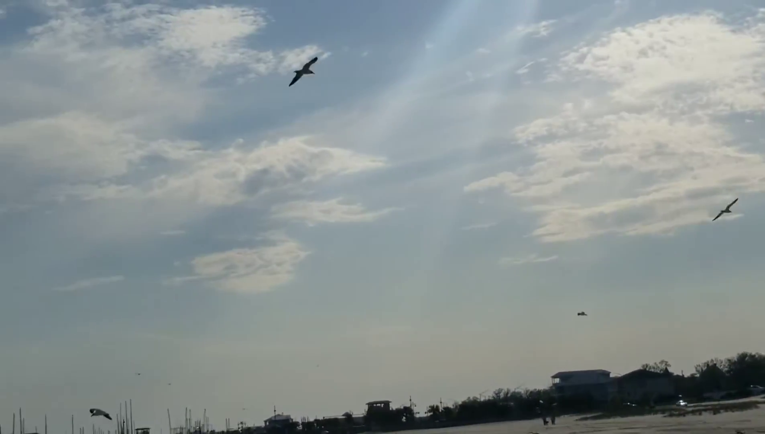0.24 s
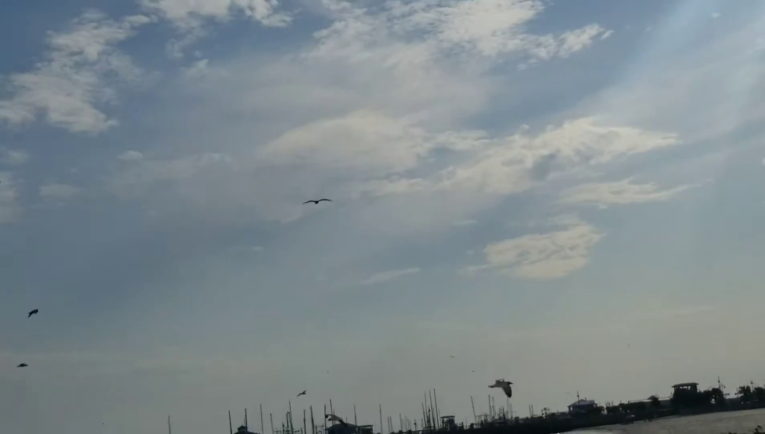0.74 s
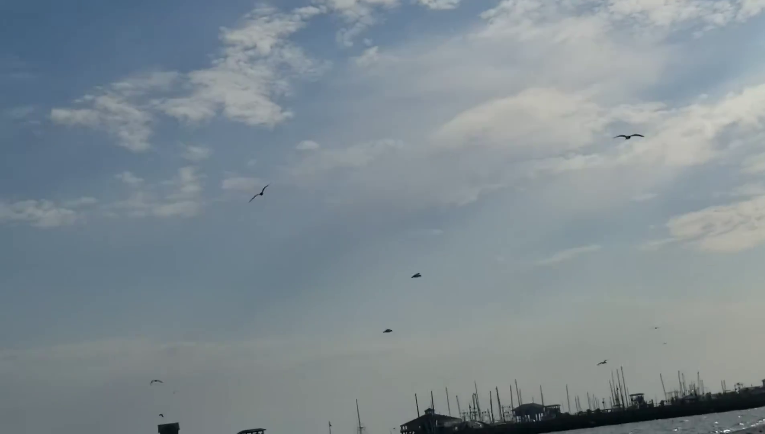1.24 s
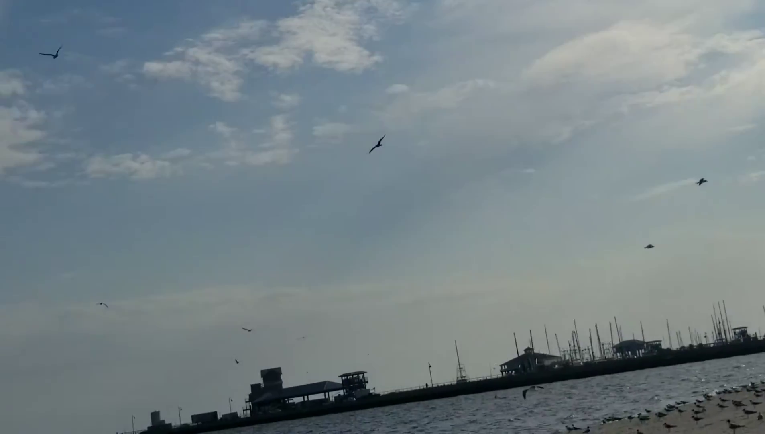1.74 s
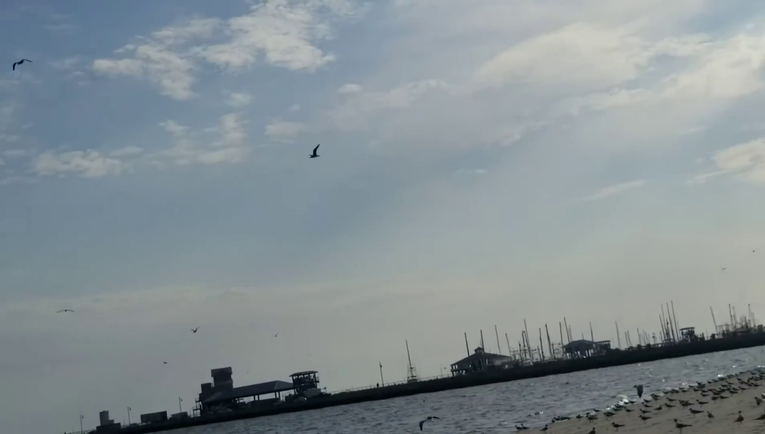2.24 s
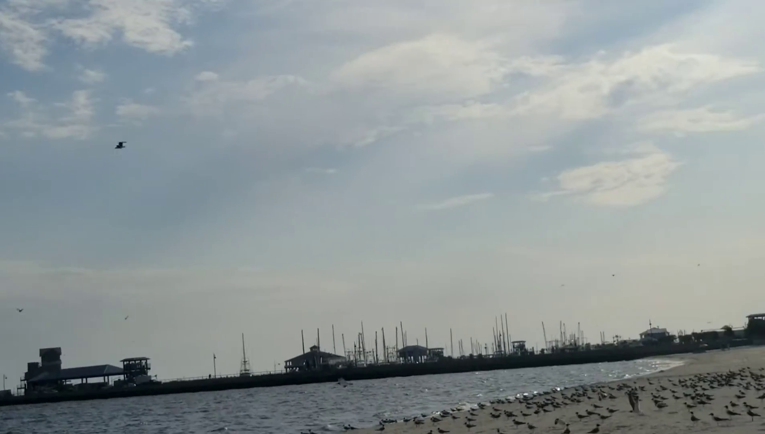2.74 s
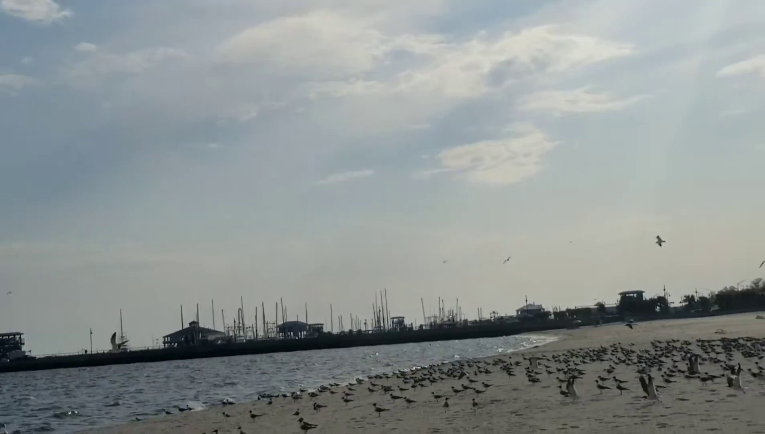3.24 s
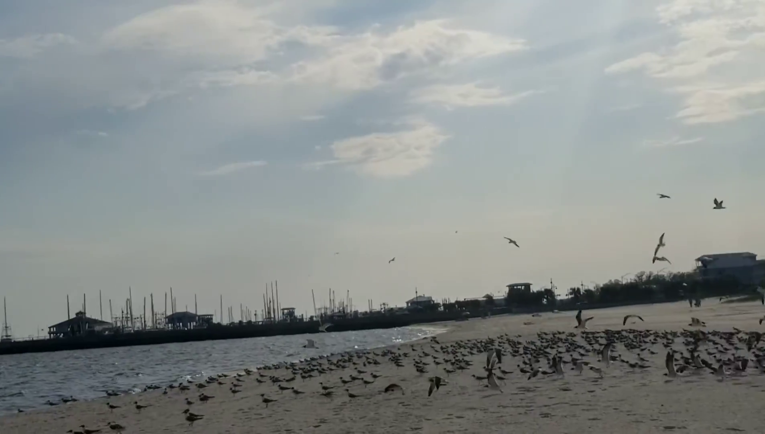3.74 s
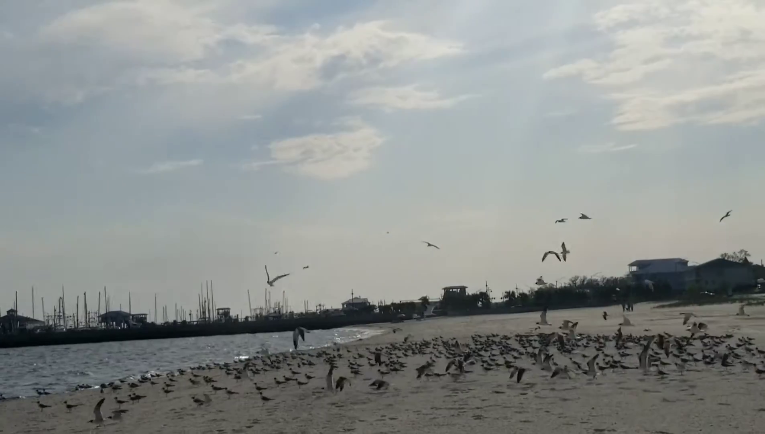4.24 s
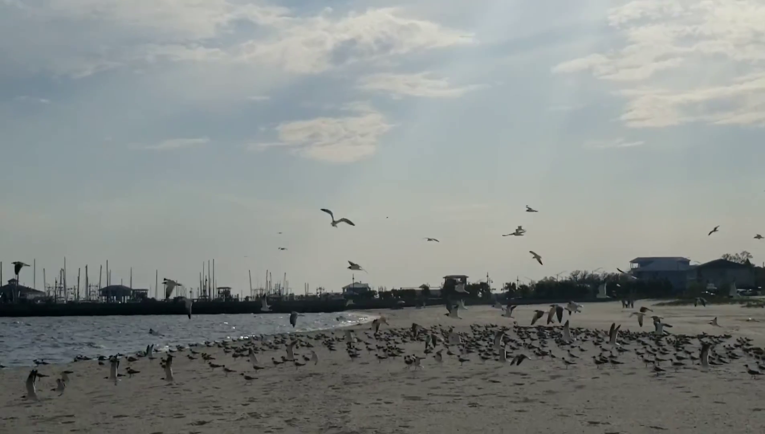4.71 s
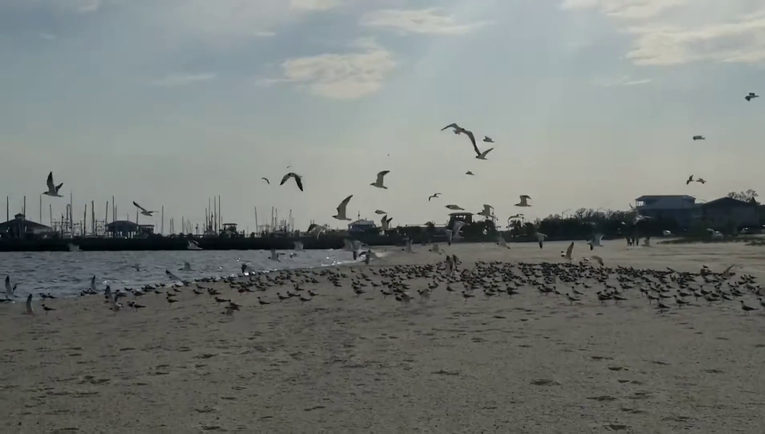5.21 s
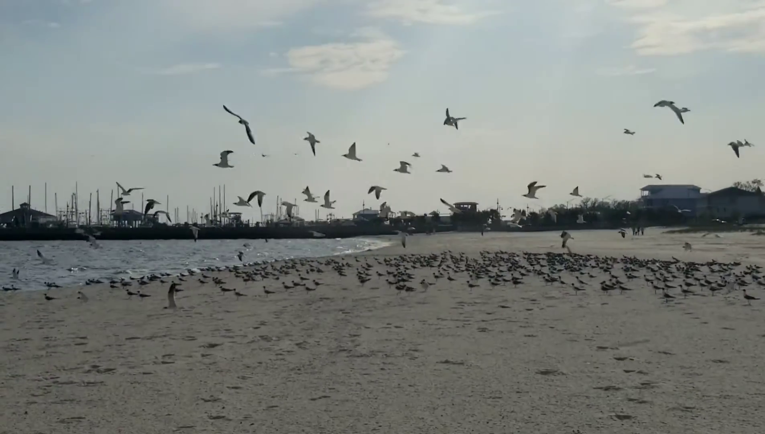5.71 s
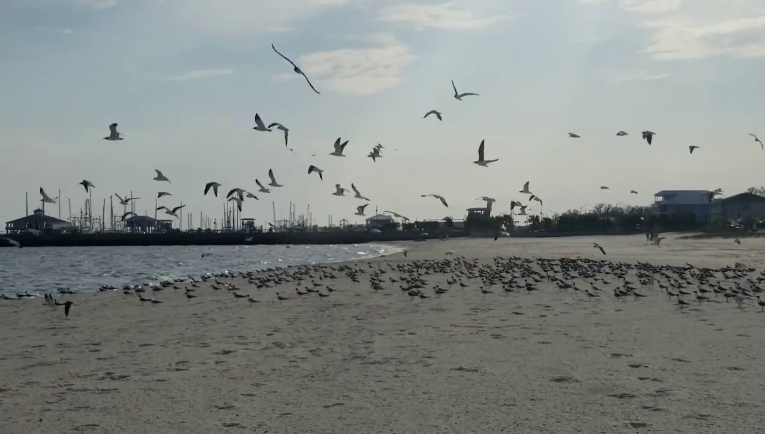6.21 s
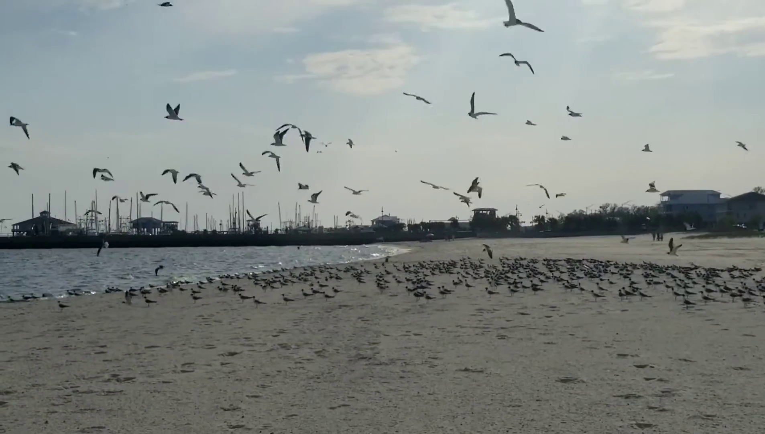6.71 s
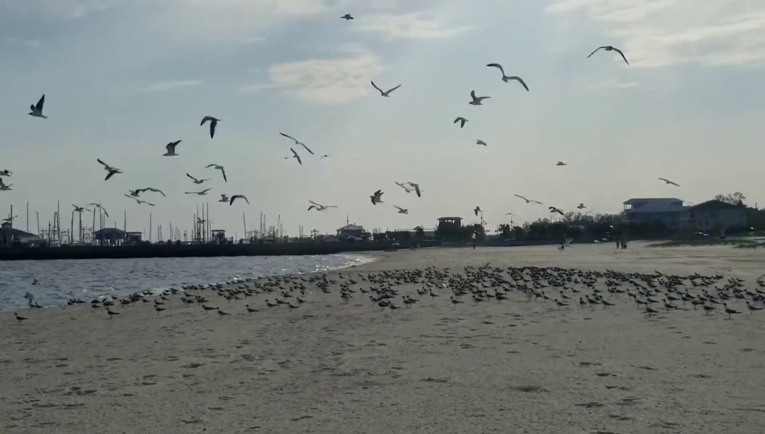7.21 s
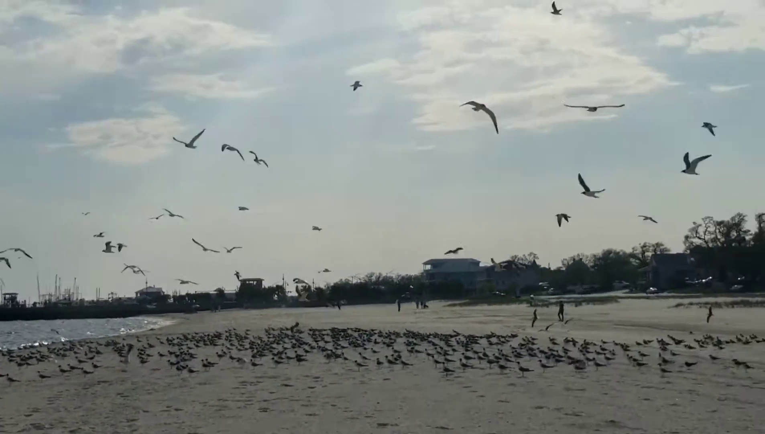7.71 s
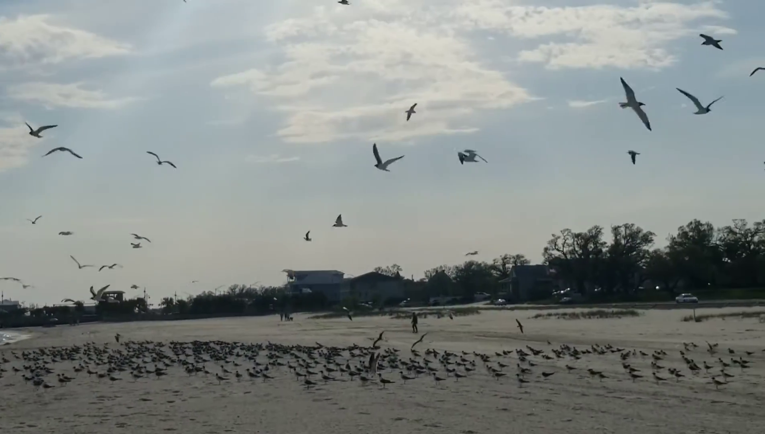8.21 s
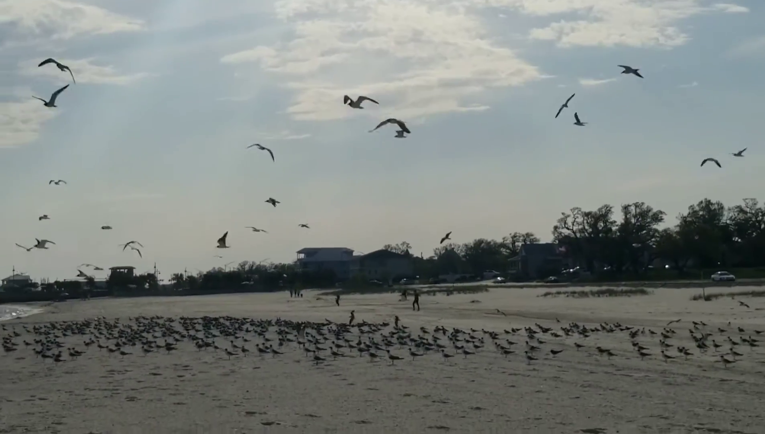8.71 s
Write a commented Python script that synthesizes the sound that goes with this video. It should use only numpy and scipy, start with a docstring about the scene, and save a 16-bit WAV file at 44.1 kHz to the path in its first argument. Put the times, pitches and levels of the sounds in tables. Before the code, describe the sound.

A continuous, overlapping gull racket in stereo: nasal, bright near yelps, mews and a few dipping wails, over a blurred mass of far voices all around. Early on, some soft knocks close to the microphone; later, a few tiny sharp ticks. The closest bird screams raspily about four seconds in, others near seven. Gentle shore wash stays faint, while lumpy wind rumble and buffets increase toward the end. Open air, little echo.

```python
"""Gulls yelp, mew and scream close by, over the constant din of a large flock on an open beach.
Each near cry is a gliding harmonic stack shaped by a throat; the din is hundreds of simpler far voices.
Soft knocks and sharp ticks close by are bursts of resonant noise. Wind on the two microphone ports is
lumpy low noise, with single pressure swings as eddies hit. Small waves hiss as slowly swelling noise."""
import sys
import numpy as np
from scipy import signal
from scipy.fft import rfft, irfft, next_fast_len
from scipy.io import wavfile
from scipy.ndimage import uniform_filter1d, map_coordinates

SR = 44100
rng = np.random.default_rng(int(sys.argv[2]) if len(sys.argv) > 2 else 0)


def master(y):
    """Save y as 16-bit WAV."""
    cut = np.clip(np.atleast_2d(y).T, -1, 1)
    pcm = np.round(cut * 32767)  # scale
    wavfile.write(sys.argv[1], SR, pcm.astype(np.int16))


N = 394694
TIME = np.arange(N) / SR


def amp(db):
    """Decibels to gain."""
    return 10 ** (np.asarray(db) / 20)


def unit(x):
    """Scales to rms 1."""
    return x / np.sqrt(np.mean(x ** 2) + 1e-20)


def read(points, hz):
    """Reads a spectrum table in dB at any frequency, on a log frequency axis."""
    f, db = np.transpose(points)
    return np.interp(np.log(hz + 1), np.log(f + 1), db)


def follow(rows, t):
    """The columns of a curve table at times t."""
    s, *columns = np.transpose(rows)
    return [np.interp(t, s, c) for c in columns]


def colour(x, gain):
    """Filters by a gain that is a function of frequency."""
    size = next_fast_len(x.shape[-1] + 4096)
    spectrum = rfft(x, size) * gain(np.fft.rfftfreq(size, 1 / SR))
    return irfft(spectrum, size)[..., :x.shape[-1]]


def drift(t, hz):
    """A random wobble of about unit size that turns hz times a second."""
    knots = rng.standard_normal(4096)
    return np.interp((t - t[0]) * hz, np.arange(len(knots)), knots)


def panned(db):
    """Left and right gains for a level difference, left minus right."""
    gains = amp(np.array([db, -db]).reshape(2, -1) / 2)
    return gains / np.sqrt(np.mean(gains ** 2, 0))


def add(mix, s, sound):
    """Mixes a stereo sound in at time s."""
    start = round(s * SR)
    sound = sound[:, max(-start, 0):]
    part = mix[:, max(start, 0):][:, :sound.shape[1]]
    part += sound[:, :part.shape[1]]


def scatter(x, t60):
    """Sparse echoes off sand and water, different at each port."""
    t = np.arange(SR // 2) / SR
    sparse = rng.random((2, len(t))) < 1 / 20
    echoes = rng.standard_normal((2, len(t))) * sparse * amp(-60 * t / t60) * (t > .003)
    echoes /= np.linalg.norm(echoes, axis=1, keepdims=True)
    return signal.fftconvolve(x, echoes, axes=1)[:, :N]


EDGE_S = .01  # a call starts this long before its glide

# a gull's throat and open bill [freq_hz, gain_db]
THROAT_SPECTRUM = [(400, -28), (750, -22.5), (1000, -11.5), (1250, -12), (1650, -1.5), (2100, 2.5),
                   (2400, -1), (2900, -2.5), (3500, -4.5), (5000, -5), (6300, -4.5), (7500, -18),
                   (9000, -27.5), (11000, -24), (15000, -36)]


def cry(t, hz, level_db, third_db, bright_db, lead_ms, rasp, flutter_db, slope_db=0, first_db=0):
    """A near gull: gliding harmonics through the throat, with rasp, half-harmonics and screeching air."""
    half_db, throb_share = -20, .75
    top_fall_db = -6  # from the sixth harmonic up
    screech_db, rasp_rise = -7, .02  # turbulent air in a hoarse voice; extra share of rasp per harmonic
    attack_s, release_s = .02, .014
    lead_s = lead_ms / 1000
    jitter = .022 * rasp
    phase = 2 * np.pi * np.cumsum(hz * (1 + jitter * drift(t, 306.4))) / SR
    level_db = level_db + throb_share * flutter_db * drift(t, 45.7)  # the voice catches and throbs

    voice = np.zeros((2, len(t)))
    for k in range(1, 16):
        bill_db = first_db * (k == 1) + third_db * (k == 3) + top_fall_db * (k > 5)
        bill_db = bill_db + (bright_db + slope_db * (k - 4)) * (k > 3)
        gain = amp(read(THROAT_SPECTRUM, k * hz) + bill_db + flutter_db * drift(t, 37.0))
        grit = rasp * (1 + rasp_rise * k) * (drift(t, 520) + 1j * drift(t, 520))
        partial = gain * (1 + grit) * np.exp(1j * (k * phase + 2 * np.pi * rng.random()))
        right = partial * np.exp(2j * np.pi * k * hz * lead_s)
        voice += np.real([partial, right])
    voice *= 1 + amp(half_db) * drift(t, 20.6) * np.cos(phase / 2)  # strong and weak cycles alternate

    puffs = rng.standard_normal(len(t)) * (1 + np.cos(phase))
    air = unit(colour(puffs, lambda f: amp(read(THROAT_SPECTRUM, f))))
    air_ports = np.array([air, np.roll(air, -round(lead_s * SR))])
    voice += amp(screech_db + bright_db / 2) * rasp * air_ports
    edges = np.minimum((t - t[0]) / attack_s, (t[-1] - t) / release_s)
    gate = np.sin(np.pi / 2 * np.clip(edges, 0, 1)) ** 2
    return t[0], np.sqrt(2) * amp(level_db) * gate * voice


def near_call(glide, start, length, pitch_hz, depth, level_db, third_db, bright_db, lead_ms):
    """One call: the glide of its kind, stretched to its length, depth and pitch, then a sagging tail."""
    tail_s, sag_per_s = .019, 3  # the tail loses pitch at this share per second
    t = np.arange(-EDGE_S, length + tail_s, 1 / SR)
    step = np.clip(t / length, 0, 1) * (len(glide) - 1)
    bend = 1 + depth * map_coordinates(np.array(glide, float), [step], order=3, mode="nearest")
    hz = pitch_hz * bend * np.exp(-sag_per_s * np.maximum(t - length, 0))
    rasp = .18 + .15 * np.clip((820 - hz) / 100, 0, 1)  # low notes turn hoarse
    return cry(start + t, hz, level_db, third_db, bright_db, lead_ms, rasp, flutter_db=3.2)


# pitch bend through each kind of call, at even steps from start to end [bend_share, before depth]
YELP_BEND = [-.02, 0, -.03, -.1, -0.22]
MEW_BEND = [-.09, -.045, -.012, 0, -.01, -0.072]
WAIL_BEND = [0.044, 0.015, -.1, -0.14, -0.057, -0.07, 0.019, -0.027, -0.17]
# The calls; pitch_hz is where the bend is 0, depth (a factor) scales the bend, levels are before the
# throat and trim, third_db and bright_db (fourth harmonic up) tilt the voice, lead_ms is the right port's:
# short falling yelps [start_s, length_s, pitch_hz, depth, level_db, third_db, bright_db, lead_ms]
YELP_CALLS = [(0.021, 0.038, 1050, 0.81, -44.5, 5, -3, -0.048), (0.043, 0.052, 1000, 1.1, -45, 1, 3, 0.27),
              (0.088, 0.039, 782, 0.37, -42, -9, -7, 0.26), (0.239, 0.038, 1037, 0.56, -41, -6, -4, 0.5),
              (0.32, 0.032, 970, 0.33, -56, -11, -2, -0.3), (0.36, 0.053, 1038, 0.53, -49.5, 4, 4, 0.25),
              (0.432, 0.04, 1040, 0.7, -43, -7, -9, 0.4), (0.452, 0.03, 870, 0.4, -43, 4, -9, 0.28),
              (0.75, 0.055, 1020, 0.6, -42, -4, -7, 0.1), (0.795, 0.06, 775, 0.35, -40, -8, -10, 0.1),
              (0.578, 0.037, 1104, 0.51, -46, -2, -11, -0.34),
              (0.602, 0.039, 1014, 1.3, -39, -11, -20, 0.18),
              (0.84, 0.046, 940, 0.58, -43.5, -1, -4, -0.29), (1.017, 0.039, 990, 0.95, -39, -7, -7, 0.11),
              (1.177, 0.038, 958, 0.69, -41.5, -13, -4, 0.14),
              (1.289, 0.048, 995, 0.47, -53.5, 3, 3.5, 0.06),
              (1.346, 0.056, 804, 0.35, -36.5, -5, -19, 0.1),
              (1.542, 0.046, 878, 0.71, -35, -2.5, -12, 0.24),
              (1.703, 0.04, 1010, 0.8, -49, -10, -14, -0.51), (1.767, 0.032, 1020, 0.59, -47, -2, 1, 0.28),
              (1.813, 0.088, 923, 0.76, -39, -3, -11, 0.34), (1.93, 0.044, 1036, 0.7, -50, 8, -4, 0.44),
              (2.098, 0.04, 960, 0.77, -49, 7.5, -1, 0.055),
              (2.233, 0.043, 945, 0.47, -34.5, -6.5, -13, -0.36),
              (2.283, 0.055, 1153, 0.88, -41, -5, -7.5, 0.21), (2.661, 0.042, 1052, 0.4, -41, 3, -12, 0.39),
              (3.063, 0.046, 1073, 0.74, -40.5, -8, -5, 0.49),
              (3.255, 0.02, 951.0, 1.03, -35, -9, -7, 0.49), (3.601, 0.047, 1077, 1.2, -45, -1, -4, 0.45),
              (3.685, 0.046, 1066, 1.03, -50.5, 4, -1, -0.33),
              (4.064, 0.034, 1040, 0.5, -43, 4, -2.5, 0.025),
              (4.439, 0.049, 993, 0.57, -42, -6, -2.5, 0.29), (4.527, 0.029, 1045, 0.72, -53, 10, -2, 0.22),
              (4.666, 0.083, 1188, 0.73, -50, -2, -12, 0.14), (4.98, 0.044, 1074, 0.92, -41, 2, -0.5, 0.43),
              (5.13, 0.041, 1184, 0.53, -37, -11, -5, 0.22),
              (5.176, 0.041, 1115, 0.47, -37, -3, -8.5, 0.01),
              (5.278, 0.027, 897, 0.74, -41, -9, -11, 0.046),
              (5.345, 0.055, 955.0, 0.57, -47, -10, 0, -0.41), (5.365, 0.059, 1044, 0.78, -50, 1, -4, -0.3),
              (5.498, 0.034, 1075, 0.71, -41.5, -5, -18, -0.41),
              (5.873, 0.04, 1160, 0.55, -43, -6, -13, -0.47), (5.925, 0.05, 1000, 0.51, -44, 6, -6, 0.44),
              (6.177, 0.048, 985, 0.68, -42, -2, -13, 0.1), (6.229, 0.072, 990, 0.51, -55, 4, -3, 0.16),
              (6.324, 0.058, 1035, 0.5, -48.5, 1, 6, 0.27), (6.343, 0.053, 1016, 0.75, -48, 2, -1, 0.26),
              (6.539, 0.046, 1074, 0.39, -42.5, -6, 0, 0.11),
              (6.558, 0.11, 1000, 0.79, -42, -12, -12, 0.038), (7.028, 0.035, 1125, 0.65, -43, 3, -5, 0.22),
              (7.238, 0.022, 912, 0.32, -52, 14, -4, -0.019), (7.92, 0.05, 930, 0.4, -42.5, -14, -21, 0.12),
              (7.607, 0.045, 1087, 1.03, -44.5, -1, -6, 0.23),
              (7.696, 0.052, 1097, 0.6, -45.5, -1, 0, 0.39), (7.761, 0.047, 1025, 0.49, -40, -6, -9, 0.2),
              (8.03, 0.035, 1020, 0.5, -39.5, -10, -14, -0.077),
              (8.236, 0.04, 1050, 0.55, -40, -5, -8, -0.4), (8.053, 0.051, 905, 0.38, -46.5, 5, -2, -0.049),
              (8.296, 0.046, 1000, 0.56, -43, 4, 2.5, 0.13), (8.327, 0.033, 860, 0.62, -38, -21, -9, 0.057),
              (8.485, 0.04, 915, 1, -40, -20, -8, 0.071), (8.653, 0.045, 890, 0.29, -40.5, -7, -18, 0.1),
              (8.781, 0.051, 905, 0.41, -38, -8, -17, 0.35), (8.561, 0.02, 1068, 0.52, -44, 3, -1, -0.41),
              (8.607, 0.048, 1068, 0.75, -40.5, 0, -4, 0.4)]
# mews, one arch that rises and sinks
# [start_s, length_s, pitch_hz, depth, level_db, third_db, bright_db, lead_ms]
MEW_CALLS = [(0.168, 0.08, 1060, 0.8, -45, -3, 0, -0.13), (0.197, 0.08, 915, 0.9, -38, -8, -8.5, 0.23),
             (0.82, 0.04, 943, 1.2, -43, 0, -14, 0.041), (0.872, 0.045, 820, 0.2, -34.5, -11, -14, 0.1),
             (0.88, 0.07, 975, 0.7, -41, -4, -9, 0.15), (0.97, 0.06, 985, 0.6, -40, -4, -9, -0.36),
             (0.35, 0.06, 1025, 0.7, -47, 4, -1, 0.13), (0.735, 0.1, 905, 0.4, -43, -4, -5, -0.43),
             (0.68, 0.085, 765, 1.8, -41, -12, -14, 0.2), (1.056, 0.077, 960, 0.35, -44, -8, -22, -0.32),
             (1.106, 0.083, 1065, 0.7, -54, 0, -8, 0.082), (1.231, 0.047, 1094, 0.7, -57.5, 18.5, 3, 0.039),
             (1.316, 0.14, 1027, 1.15, -52.5, 10.5, 0, 0.38), (1.377, 0.12, 964, 0.48, -45.5, 0, -5, 0.29),
             (1.548, 0.069, 872, 0.8, -43, -2, -16, 0.33), (1.888, 0.077, 927, 0.7, -50, -1, 4, 0.22),
             (2.044, 0.059, 1024, 0.6, -44.5, 1, -2, -0.062), (2.37, 0.29, 1065, 1.37, -44, -3.5, -7, 0.32),
             (2.514, 0.085, 947, 0.71, -48.5, 5, 2.5, 0.19), (2.783, 0.08, 992, 0.45, -43, 2, 6, 0.34),
             (3.039, 0.2, 974, 0.65, -42, -3, -4, -0.46), (3.146, 0.11, 849, 0.5, -42, -4, -1.5, 0.39),
             (3.432, 0.044, 1015, 1.2, -48, -4, 0, 0.25), (3.499, 0.13, 953, 1, -45, -8, -4, 0.27),
             (3.682, 0.093, 956, 0.75, -50, -2, 3, -0.43), (3.925, 0.09, 1034, 0.75, -46.5, -3, 0, 0.57),
             (4.1, 0.056, 1063, 0.3, -49, -10, -13, 0.45), (4.101, 0.22, 889, 0.53, -38.5, -6, -9, 0.4),
             (4.16, 0.17, 990, 1.7, -42, 3, -2.5, 0.3), (4.412, 0.11, 884, 1.07, -40, -3, -9.5, 0.27),
             (4.552, 0.14, 911, 1.0, -38.5, -9, -9.5, 0.25), (4.795, 0.087, 1044, 1.7, -45, -6, -11, 0.25),
             (5.104, 0.18, 934, 1.0, -42, 0, -2, 0.43), (5.219, 0.087, 1038, 0.91, -45, -4, 0.5, 0.16),
             (5.247, 0.12, 992, 0.41, -44.5, -2, 4, -0.39), (5.45, 0.08, 1010, 1.1, -45, -1, -7, -0.27),
             (5.55, 0.09, 810, 0.2, -41, -10, -16, 0.1), (5.925, 0.1, 1055, 0.3, -40.5, -9, -10, 0.27),
             (6.045, 0.07, 1082, 0.25, -43, -12, -14, -0.4), (5.98, 0.05, 1005, 1.3, -47, 5, 0, -0.07),
             (6.62, 0.055, 875, 0.6, -36, -11, -17, 0.1), (6.472, 0.035, 1040, 0.6, -40.5, -2, 2.5, 0.23),
             (6.502, 0.13, 992, 0.48, -52.5, -10, 8, 0.32), (7.09, 0.2, 992, 0.65, -42, -6, -18, 0.2),
             (7.23, 0.16, 927, 0.42, -42.5, 0, -13, -0.28), (8.111, 0.068, 949, 0.6, -37.5, -8, -22, -0.15),
             (8.345, 0.07, 1050, 0.5, -42, -4, -11, 0.4), (8.406, 0.13, 995, 1, -46, 0, -3, 0.13),
             (8.69, 0.11, 865, 0.3, -43, 1, -8, 0.36), (8.701, 0.097, 1013, 0.6, -50, -3, -7, -0.44),
             (7.759, 0.036, 936, 1.2, -45, 0, 0.5, -0.2), (8.89, 0.1, 1063, 1.2, -48, 0, 1, 0.17)]
# wails that dip, rise and drop away
# [start_s, length_s, pitch_hz, depth, level_db, third_db, bright_db, lead_ms]
WAIL_CALLS = [(3.291, 0.41, 885, 0.68, -57, 9, 6, 0.075), (4.869, 0.28, 981, 0.81, -42, -1.5, -9.5, 0.3),
              (7.771, 0.18, 938, 0.8, -42.5, -6, -8, 0.22)]


def yelps_mews_and_wails(trim_db=.8):
    """The other near calls, each kind with its own pitch glide through the call."""
    calls = np.zeros((2, N))
    for bend, table in (YELP_BEND, YELP_CALLS), (MEW_BEND, MEW_CALLS), (WAIL_BEND, WAIL_CALLS):
        for row in table:
            add(calls, *near_call(bend, *row))
    return amp(trim_db) * calls


# the closest cries and screams, a curve each; level before throat and trim
# [time_s, pitch_hz, level_db, third_db, bright_db, rasp_share]
CLOSE_CURVES = [
    [(0.43, 992, -54, 6, -2, .2), (0.455, 995, -44, 6, -8, .3), (0.52, 1003, -44, 4, -11, .2),
     (0.585, 1003, -45, 3, -10, .2), (0.62, 985, -41, 0, -10, .35), (0.65, 790, -47, 0, -6, .5)],
    [(2.642, 900, -44, 0, 0, .7), (2.658, 945, -35, -1, 0, .3), (2.715, 835, -38, 1, -3, .25),
     (2.76, 865, -37, 0, 0, .35), (2.81, 878, -37, 1, 0, .22), (2.87, 860, -37, 1, -3, .3),
     (2.89, 780, -48, 0, -4, .6)],
    [(3.853, 730, -48, 3, -2, 1), (3.872, 775, -35, 7, 5, 0.4), (3.892, 768, -31, -3, -4, 0.25),
     (3.925, 627, -27, -8, -11, 0.37), (3.96, 691, -29.5, -14, -14, 0.4),
     (3.987, 839, -22.5, -11, -17, 0.2), (4.02, 824, -26, -15, -19, .15), (4.05, 798, -30, -12, -13, .2),
     (4.085, 744, -26, -16, -18, 0.25), (4.098, 610, -34, -12, -16, 0.3)],
    [(5.615, 1012, -50, 4, 7, .15), (5.63, 1012, -45, 3, 7, .06), (5.68, 888, -46, 2, 0, .05),
     (5.72, 905, -47, 4, 4, .04), (5.785, 988, -47, 6, 6, .03), (5.815, 992, -47, 6, 6, .03),
     (5.855, 960, -48, 5, 2, .08), (5.88, 880, -55, 2, 0, .2)],
    [(6.705, 770, -42, 3, 2, .8), (6.722, 865, -34, 0, -4, .7), (6.745, 900, -35, -6, -13, .6),
     (6.78, 890, -37, -8, -12, .45), (6.84, 945, -38, -5, -9, .5), (6.93, 930, -39, -5, -9, .5),
     (6.96, 880, -46, -4, -8, .7)],
    [(6.83, 745, -41, -1, -4, .3), (6.88, 735, -35, -2, -8, .2), (6.945, 724, -34, -4, -10, .2),
     (6.965, 735, -31, -12, -13, .3), (6.985, 865, -28, -16, -13, .2), (7.02, 870, -33, -12, -10, .15),
     (7.046, 800, -30, -15, -16, .25), (7.064, 640, -37, -14, -17, .3)],
    [(7.212, 1033, -45, 14, 5, 0), (7.235, 1109, -39, 2, -5, 0.3), (7.26, 1048, -49, 4, 4, 0.24),
     (7.285, 956, -57, 0, 11, 0.07), (7.32, 997, -43, 4, 1.5, 0.2), (7.358, 1019, -39.5, 4, 1, 0.1),
     (7.395, 1014, -37.5, -1.5, -4.5, 0.1), (7.43, 783, -49, 0, -10, 0.1)],
]
# the bird behind each curve: lead of the right port, slope above the fourth harmonic, fundamental
# [lead_ms, slope_db per harmonic, first_db]
CLOSE_BIRDS = [(.35, -.5, 10), (.37, .4, 2), (-.04, -2.5, 0), (.35, -1, 0), (-.2, .6, 4), (-.13, .3, 2),
               (.02, 0, 4)]


def close_cries(trim_db=.8, flutter_db=1.5):
    """The closest birds: over so short a path their harmonics hardly waver."""
    close = np.zeros((2, N))
    for rows, (lead_ms, slope_db, first_db) in zip(CLOSE_CURVES, CLOSE_BIRDS):
        t = np.arange(rows[0][0] - EDGE_S, rows[-1][0] + EDGE_S, 1 / SR)
        hz, level_db, third_db, bright_db, rasp = follow(rows, t)
        add(close, *cry(t, hz, level_db, third_db, bright_db, lead_ms, rasp, flutter_db, slope_db, first_db))
    return amp(trim_db) * close


def near_gulls(echo_db=-14):
    """The birds that stand out from the flock, with their faint echo off sand and water."""
    near = yelps_mews_and_wails() + close_cries()
    return near + amp(echo_db) * scatter(near, t60=0.55)


def far_voices(count=60, timbre_db=2.5):
    """Single-cycle waveforms of twelve harmonics: every far voice stresses different ones."""
    turn = np.arange(4096) / 4096
    voices = []
    for _ in range(count):
        partials = [amp(timbre_db * rng.standard_normal()) * np.cos(2 * np.pi * (k * turn + rng.random()))
                    for k in range(1, 13)]
        voices.append(unit(sum(partials)))
    return voices


# gull voices heard from far down the sand [freq_hz, gain_db]
FAR_SPECTRUM = [(400, 8), (800, -5), (1000, -12.5), (1250, -7.5), (1620, 7.5), (2000, -3.5), (2300, -4.5),
                (2800, -2), (3400, -10.5), (4900, -8.5), (6500, -17.5), (8000, -29.5), (11000, -35.5),
                (15000, -32)]
# the din of the flock: level before trim, and a brightness cue scaled by shrill
# [time_s, level_db, bright_db]
DIN_CURVE = [(0, -35.5, 9), (.6, -33, -1.5), (1.05, -36, 5), (1.35, -40, 5), (1.65, -35.5, -17),
             (2.4, -36, -2), (2.75, -29.5, -8), (3.0, -35, -2), (3.15, -34.5, -16), (3.75, -36, -8),
             (4.15, -35.5, -5), (4.55, -41.5, -8), (4.9, -40, 0), (5.25, -32, -13), (5.45, -34.5, -11),
             (5.85, -38.5, 5), (6.75, -28, -26), (7.0, -32, -13), (7.3, -37.5, 9), (7.6, -40, -5),
             (8.1, -35.5, -3), (8.95, -38, -2)]


def flock(count=460, pitch_hz=940, pitch_spread=.085, port_delay_s=.00048, shrill=0.3):
    """Hundreds of far gulls: short falling yelps and longer wails that dip, rise and drop away."""
    yelp = [1.02, 1.08, 1.08, 1.04, .98, .86]  # pitch factors through a call
    wail = [.96, .92, .97, 1.02, 1.04, 1.02, .9]
    thinning, wail_db = 1.2, -4  # the chorus thins with time (1 = even); wails are softer
    jitter, rasp, spread_db = .008, .12, 3.5  # shares of pitch and level; spread of loudness
    echo_db, trim_db = -7, -.9
    voices = far_voices()
    wobble, calls = drift(TIME, 330), np.zeros((2, N))
    chances, spreads = rng.random((count, 4)), rng.standard_normal((count, 3))
    for k, ((when, kind, span, bearing), (high, size, side)) in enumerate(zip(chances, spreads)):
        if kind < .72:
            shape, seconds, db = yelp, .055 + .06 * span, 0
        else:
            shape, seconds, db = wail, .16 + .14 * span, wail_db
        u = np.linspace(0, 1, int(seconds * SR))
        glide = uniform_filter1d(np.interp(u, np.linspace(0, 1, len(shape)), shape), len(u) // 6)
        hz = pitch_hz * np.exp(pitch_spread * high) * glide
        hz *= 1 + jitter * np.roll(wobble[:SR], k * 97)[:len(u)]
        voice = voices[k % len(voices)]
        call = voice[(np.cumsum(hz) / SR % 1 * len(voice)).astype(int)]
        call = call * np.sqrt(abs(np.sin(np.pi * u ** 0.91))) * amp(db + spread_db * min(size, 1))
        call *= 1 + rasp * wobble[k * 500:][:len(u)]
        lag = int(port_delay_s * SR * np.cos(np.pi * bearing))  # birds stand all around
        start = ((k + when) / count) ** thinning * (N / SR + .3) - .3
        add(calls, start, np.array([call, np.roll(call, lag)]) * panned(2 * side - 1))

    din = colour(calls + amp(echo_db) * scatter(calls, t60=0.32), lambda f: amp(read(FAR_SPECTRUM, f)))
    din /= np.sqrt(uniform_filter1d(np.mean(din ** 2, 0), SR // 5) + 1e-12)  # even level, ready for the curve
    level_db, bright_db = follow(DIN_CURVE, TIME)
    upper = colour(din, lambda f: 1 / (1 + (3300 / (f + 1)) ** 8))
    upper_gain = amp(shrill * (bright_db - bright_db.mean())) - 1  # the treble follows its own curve
    return amp(level_db + trim_db) * (din + upper * upper_gain)


def tap(hz, decay_s, sharpness):
    """A burst of noise that dies in a resonance; peak 1."""
    t = np.arange(SR // 12) / SR
    noise = rng.standard_normal(len(t)) + 0.72 * rng.standard_normal((2, len(t)))
    noise *= np.exp(-t / decay_s)
    b, a = signal.iirpeak(min(hz, SR / 3), sharpness, SR)
    burst = signal.lfilter(b, a, signal.lfilter(b, a, noise))
    return burst / abs(burst).max()


# soft dull knocks close by, level before trim [start_s, level_db, pitch_hz]
KNOCK_HITS = [(1.118, -39, 875), (1.224, -46, 1280), (1.243, -33, 980), (1.282, -26, 888),
              (1.293, -36, 522), (1.313, -33, 686), (1.475, -30.5, 1140), (1.59, -30, 440),
              (1.664, -33, 860), (1.69, -34, 891), (1.751, -29.5, 820), (1.794, -36, 730),
              (1.824, -32.5, 861), (1.862, -31, 830), (1.886, -36, 934), (1.91, -28.5, 835),
              (2.084, -34, 650), (2.096, -32, 970)]
# small sharp ticks, the first a thin ringing one
# [start_s, peak_db, centre_hz, decay_s, sharpness (Q of the resonance)]
TICK_HITS = [(3.052, -39, 12700, .03, 25), (4.346, -42, 13000, .002, 1.6),
             (5.865, -30.5, 12000, .0026, 1.8), (6.659, -41, 13000, .003, 1.6),
             (6.724, -35, 12500, .006, 1.6)]


def taps(knock_trim_db=3, knock_decay_s=0.0074):
    """Dull knocks are noise in a broad low resonance; sharp ticks sit in a high, narrower one."""
    out = np.zeros((2, N))
    for s, db, hz in KNOCK_HITS:
        add(out, s, amp(db + knock_trim_db) * tap(hz, knock_decay_s, sharpness=0.51))
    for s, db, hz, decay_s, sharpness in TICK_HITS:
        add(out, s, amp(db) * tap(hz, decay_s, sharpness))
    return out


# single eddies that hit a port: level before trim; only the sign of side_db counts, above 0 is left
# [start_s, level_db, side_db]
EDDIES = [(3.516, -31, 0.5), (3.665, -24, -3.0), (4.182, -25, 11), (4.524, -29, 1.0), (4.671, -21, 0.5),
          (5.435, -24, 0.5), (5.637, -39, 1), (5.842, -24, 0.5), (6.002, -22.5, 0.5), (6.488, -30, 1),
          (6.893, -32, 3.0), (7.302, -22.5, 3), (7.361, -20, 2), (7.87, -15, 5), (8.012, -21, 8),
          (8.093, -36, -2), (8.735, -23, 0.5)]


def buffets(width_s=0.0021, trim_db=-4, far_port_db=-9):
    """An eddy passing a port gives one pressure swing; the other port feels it weakly."""
    out, t = np.zeros((2, N)), np.arange(SR // 20) / SR
    draws = rng.uniform(-1.03, 1, (len(EDDIES), 3))
    for (s, db, side_db), (size, sign, other) in zip(EDDIES, draws):
        u = (t - .016) / (width_s * amp(2.7 * size))
        swing = (1 - u ** 2) * np.exp(-u ** 2 / 2)
        ports = np.array([[np.sign(sign)], [np.sign(other) * amp(far_port_db)]])
        if side_db <= 0:
            ports = ports[::-1]
        add(out, s - .004, 2 * amp(db + trim_db) * swing * ports)
    return out


# tone of the wind, before a further roll-off [freq_hz, gain_db]
WIND_SPECTRUM = [(15, -7), (30, -13), (55, 2.5), (95, 2), (180, -5.5), (270, -11.5), (380, -16), (600, -24)]
# the steady breeze, stronger on the left port at first; side is left minus right
# [time_s, level_db, side_db]
BREEZE_CURVE = [(0, -46.5, 39), (.7, -38, -3.5), (1.2, -45.5, 17), (1.6, -38, 18), (2.05, -46, 27),
                (2.6, -38.5, -4.5), (3.35, -47.5, 16), (3.6, -38, -7), (4.3, -42, 12.5),
                (4.65, -34.5, -4.5), (5.1, -37.5, 4.5), (5.6, -35, -1.5), (6.6, -36.5, 2),
                (7.35, -35.5, -0.5), (7.48, -47, 21), (7.75, -33, 0.5), (8.4, -36, 5.5), (8.95, -36.5, 7)]
# short gusts on top of it: moment of the peak, rise time, left minus right
# [peak_s, rise_s, peak_db, side_db]
GUST_SWELLS = [(0.178, 0.062, -34, 1), (3.289, 0.049, -34.5, -1), (3.587, 0.32, -33.5, 0),
               (3.97, 0.079, -36.5, 0), (5.844, 0.02, -47, -8), (6.178, 0.029, -25, -3),
               (6.35, 0.06, -31, -16), (6.509, 0.024, -26.5, 1), (6.91, 0.039, -31.5, -3.5),
               (7.138, 0.033, -30.5, 0), (7.882, 0.046, -35, -10), (8.014, 0.039, -25.5, -5.5),
               (8.105, 0.075, -28, 1), (8.472, 0.012, -24, 6), (8.771, 0.038, -23.5, -4)]


def wind(shared_lumps_db=4.0, port_lumps_db=5.0):
    """Turbulence at each port: low noise that comes in lumps and swells with the breeze and its gusts."""
    level_db, side_db = follow(BREEZE_CURVE, TIME)
    power = (amp(level_db) * panned(side_db)) ** 2
    for s, rise, db, side_db in GUST_SWELLS:
        swell = amp(db) * panned(side_db) * np.hanning(int(2 * rise * SR))
        add(power, s - rise, swell ** 2)
    port_drift = np.array([drift(TIME, 60), drift(TIME, 60)])
    lumps = amp(shared_lumps_db * drift(TIME, 45) + port_lumps_db * port_drift)
    air = colour(rng.standard_normal((2, N)) * lumps,
                 lambda f: amp(read(WIND_SPECTRUM, f)) / (1 + (f / 520) ** 6))
    return air * np.sqrt(power / (uniform_filter1d(air ** 2, SR // 6, axis=1) + 1e-12))


# tone of the wash [freq_hz, gain_db]
WASH_SPECTRUM = [(100, -52), (300, 0), (500, 0), (850, 5.5), (1250, 3), (2500, 7), (5000, -38), (8000, -39),
                 (15500, -28)]
# waves breaking and draining, relative to the wash level [time_s, swell_db]
SURF_CURVE = [(0, 9.5), (.6, 4.5), (1.1, 4.5), (3, 3.5), (4.6, 2.5), (6, 4.5), (7.5, 4), (8.1, 9.5),
              (8.95, 4)]
# tone of the faint hiss [freq_hz, gain_db]
HISS_SPECTRUM = [(1000, 1.5), (7000, 5), (9000, -2.5), (11000, 1), (12400, 3.5), (14000, -0.5),
                 (15800, -2.5)]
# how the hiss wanders around its own level [time_s, wander_db]
HISS_CURVE = [(0, 3.5), (1.4, -2.5), (2.2, 5), (2.8, 2), (3.6, 2), (4.9, 4), (5.6, 1.5), (6.7, 4),
              (7.5, 2.5), (8.2, 6), (8.95, 3.5)]


def waves(wash_db=-47, shared=0.43, hiss_db=-59.0):
    """Small waves along the shore: a soft, slowly swelling noise wash over a faint hiss."""
    noise = rng.standard_normal((2, N)) + shared * rng.standard_normal(N)
    swell_db, = follow(SURF_CURVE, TIME)
    wash = unit(colour(noise, lambda f: amp(read(WASH_SPECTRUM, f))))
    wander_db, = follow(HISS_CURVE, TIME)
    hiss = unit(colour(rng.standard_normal((2, N)), lambda f: amp(read(HISS_SPECTRUM, f))))
    return amp(wash_db + swell_db) * wash + amp(hiss_db + wander_db) * hiss


def scene():
    """Near cries over flock, taps, wind and shore."""
    return near_gulls() + flock() + taps() + buffets() + wind() + waves()


def record(dry, edge_hz=15850):
    """The recorder's band limit: a steep low-pass."""
    lowpass = signal.firwin(511, edge_hz, window=("kaiser", 9), fs=SR)
    return signal.oaconvolve(dry, lowpass[None], "same")


dry = scene()
out = record(dry)
master(out)
```